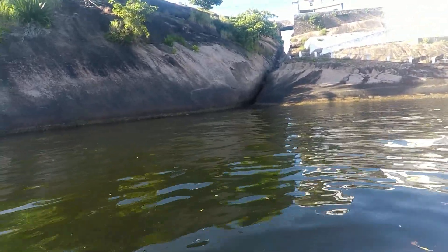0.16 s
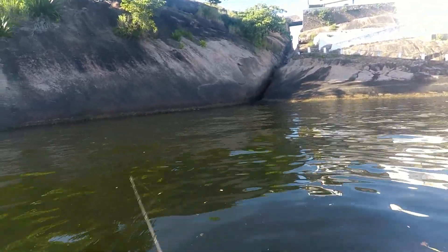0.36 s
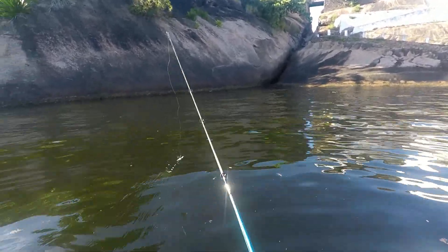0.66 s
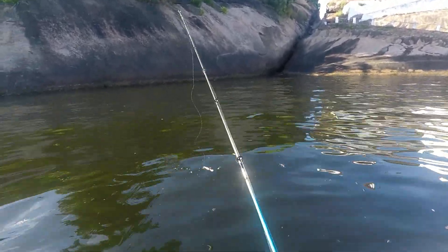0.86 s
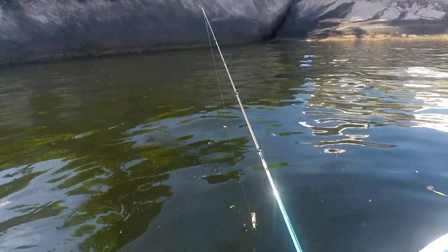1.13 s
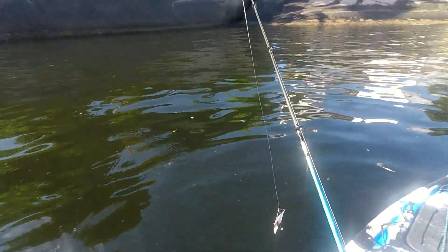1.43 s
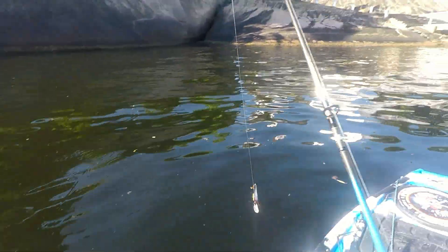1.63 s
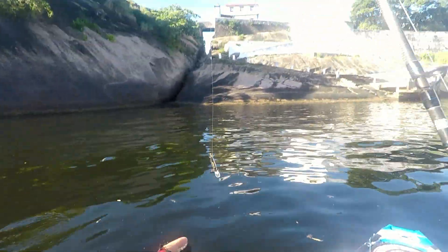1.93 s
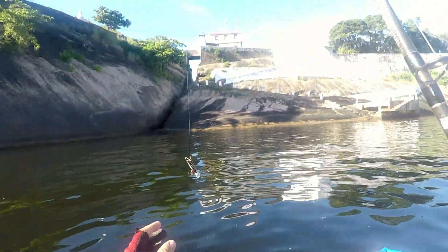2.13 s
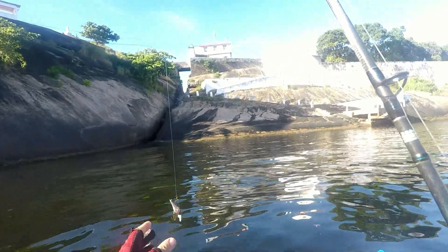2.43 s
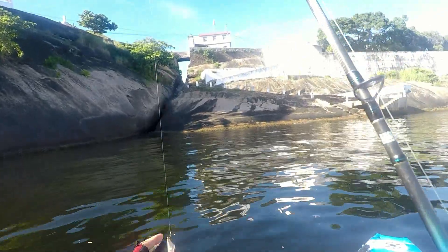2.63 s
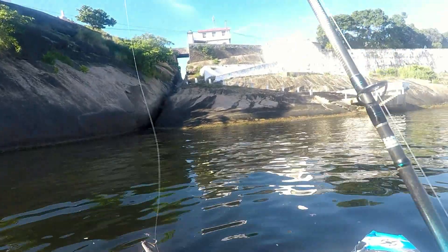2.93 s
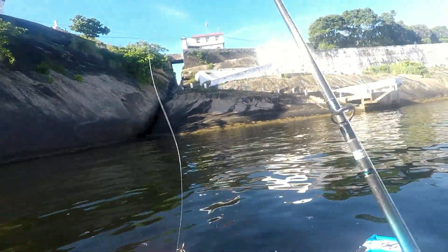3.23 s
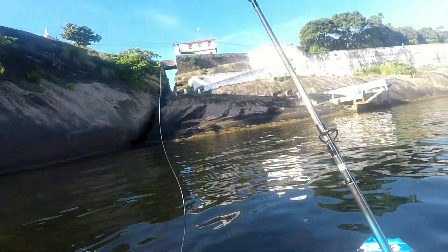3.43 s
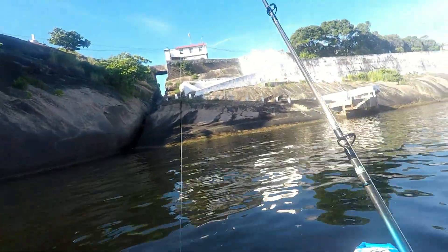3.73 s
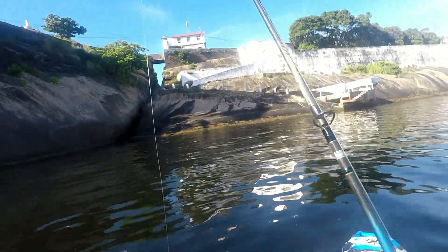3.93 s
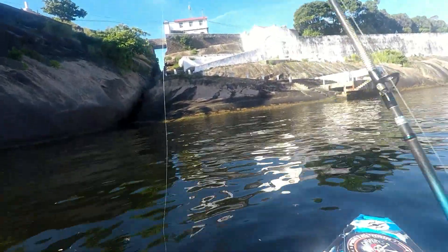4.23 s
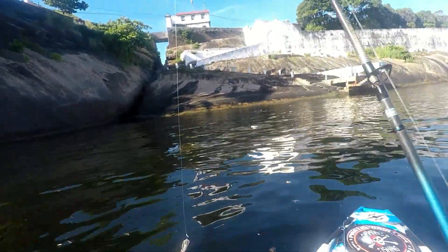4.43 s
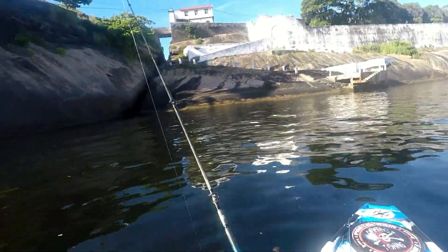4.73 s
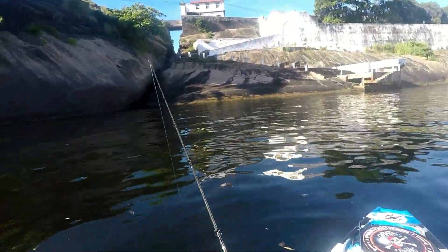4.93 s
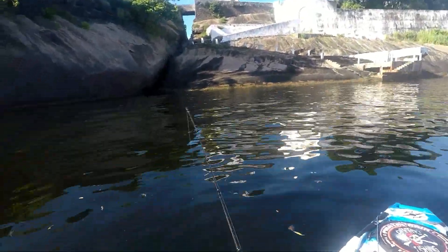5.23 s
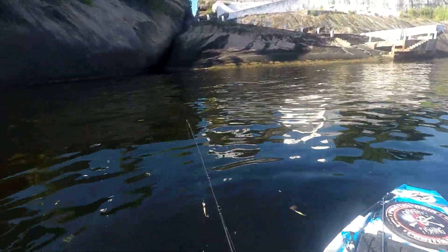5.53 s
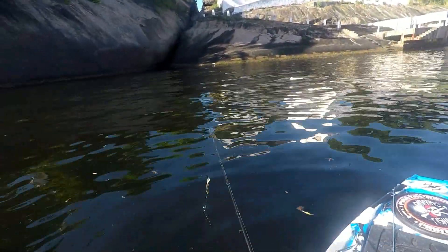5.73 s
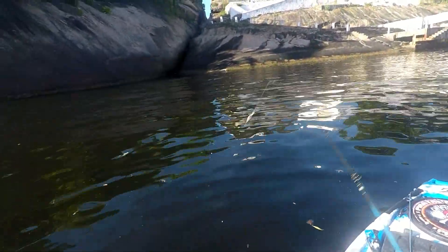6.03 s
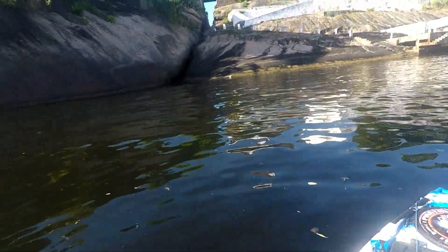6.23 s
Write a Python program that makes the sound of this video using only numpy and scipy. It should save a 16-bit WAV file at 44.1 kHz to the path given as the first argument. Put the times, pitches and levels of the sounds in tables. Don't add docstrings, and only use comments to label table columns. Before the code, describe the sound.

Outdoors on a small kayak, a distant engine throbs low and continuously beneath lapping water and thin hiss. Small ticks begin, then a cluster of dull knocks peaks sharply just after two seconds. A reel clatters and briefly whirrs, line snaps crackle, and more hard bumps follow before it settles to lighter taps. The close mounted microphone makes the handling loud and dry.

```python
import sys
import numpy as np
from scipy import signal
from scipy.fft import rfft, irfft, next_fast_len
from scipy.io import wavfile
from scipy.ndimage import uniform_filter1d, minimum_filter1d, map_coordinates

SR = 44100
rng = np.random.default_rng(int(sys.argv[2]) if len(sys.argv) > 2 else 0)


def unload_wav(signal):
    wavfile.write(
        sys.argv[1],
        SR,
        np.round(np.clip(np.atleast_2d(signal).T, -1, 1) * 32767).astype(np.int16),
    )


def to_linear_factor(level_db):
    exponent = np.asarray(level_db, float) / 20
    return 10 ** exponent


N = 280917

SHAFT_HZ = 6.003
# (order of cycle rate, level [dB rms])
DIESEL_ORDERS = [(7, -23), (8, -32.5), (9, -22.5), (12, -42), (13, -22.5), (14, -46.5), (15, -19.5),
                 (16, -33), (17, -27), (18, -41.5), (19, -36), (20, -25.5), (23, -48), (25, -34.5),
                 (36, -43.5)]
# (frequency [Hz], level [dB rms])
GENERATOR_LINES = [(50.0, -39), (100.7, -35), (184.0, -37), (200.5, -45.5), (250.5, -46.5), (263.0, -50.5)]
# (frequency [Hz], density [dB/Hz])
RUMBLE_SPECTRUM = [(12, -39.5), (28, 0), (45, 1.5), (62, 3.5), (75, -3), (112, -1.5), (128, -7),
                   (185, -12.5), (195, -15), (270, -23), (350, -37), (460, -60.5), (600, -120)]
# (frequency [Hz], density [dB/Hz])
SWELL_SPECTRUM = [(10, -42.5), (20, -4), (28, 11.5), (34, 3), (45, -64.5)]
SWELL_DB, SWELL_SWINGS_DB, DIESEL_SWINGS_DB = -30, 5.5, -0.6
# (frequency [Hz], density [dB/Hz])
WASH_SPECTRUM = [(100, -62), (200, -4.5), (400, -2.5), (490, -4), (620, -7), (900, -7.5), (1300, -13),
                 (2000, -18.5), (3300, -25), (4700, -28.5), (9000, -46), (13000, -75)]
# (frequency [Hz], density [dB/Hz])
HISS_SPECTRUM = [(1800, -71), (3300, -10), (4800, -9.5), (5800, -2.5), (7100, -4), (7750, -2), (8400, -6),
                 (9800, -9.5), (11500, -33), (14000, -67)]
# (frequency [Hz], density [dB/Hz])
AIR_SPECTRUM = [(8500, -37.5), (10200, 2), (12300, -13), (13800, -16), (15300, -43.5)]
# (time [s], hiss level [dB])
STIR_DB = [(0.0, -50), (0.9, -50), (1.09, -48.5), (1.27, -52.5), (1.64, -55.5), (2.0, -51.5), (2.4, -54),
           (2.75, -51), (3.1, -50.5), (3.28, -45), (3.46, -49.5), (4.19, -51.5), (4.37, -49.5),
           (4.7, -55.5), (5.1, -52), (5.64, -45.5), (5.82, -50.5), (6.05, -47.5)]
WASH_DB, WASH_DB_PER_STIR_DB = -41.5, 0.29

# (frequency [Hz], left minus right [dB], likeness of diffuse sound [0-1])
PORT_MATCH = [(100, 6.5, 0.6), (353, 7.5, 0.64), (600, -4.5, 0.8), (1270, 2, 0.61), (1740, 0, 0.6),
              (2310, 0, 0), (3440, -1.5, 0.8), (4630, -4.5, 0.2), (5600, -9.5, 0), (7680, -15.5, 0),
              (9300, -5, 0), (12300, -10, 0)]
# (frequency [Hz], lead [rad])
AIR_LEAD_RAD = [(100, -2.6), (500, -3.7), (1200, -3.8), (1700, -5.0), (2400, -4.4), (3300, -5.8),
                (4400, -6.0), (5500, -8.0), (9000, -6.0)]
# (frequency [Hz], lead [rad])
MOUNT_LEAD_RAD = [(100, -2.6), (520, -2.4), (720, -3.6), (1200, -3.6), (1400, -2.3), (1750, 1.3),
                  (2100, 2.8), (2600, 2.2), (3400, .8), (4400, .3), (5500, -2.0), (8000, -3.5)]

# (frequency [Hz], level [dB], t60 [s])
HULL_MODES = [(278, 3.5, 0.019), (418, -0.5, 0.016), (523, -4, 0.019)]
# (multiple of mount pitch, level [dB], t60 [s])
MOUNT_MODES = [(.65, -7, 0.023), (1.0, 5.5, 0.015), (1.3, -3, 0.012), (1.55, -6.5, 0.012), (2.15, -23, .01)]
# (frequency [Hz], level [dB], t60 [s])
ROD_MODES = [(2410, 4.5, 0.011), (2945, -5, 0.011), (3340, -9, 0.0063), (4120, -13.5, 0.0086)]
# (frequency [Hz], level [dB], t60 [s])
REEL_MODES = [(4440, -5.5, 0.021), (5040, -5, 0.016), (5850, -15, .015), (6380, -18, 0.0081),
              (7670, -5.5, 0.014), (8360, 1, 0.015), (11500, -32.5, 0.0079)]

# (time [s], peak [dB], brightness above 10 kHz [dB])
TICK_EVENTS = [(0.1753, -22.5, -32), (3.216, -35, -28), (0.93, -31, -23), (1.0055, -32, -32),
               (1.0546, -22, -32), (1.0969, -31, -23), (1.1025, -23, -18), (2.7067, -30, -22),
               (2.7543, -30, -23), (2.7656, -31.5, -19), (2.9186, -25, -32), (3.2199, -21, -9),
               (3.2333, -26, -25), (3.2551, -29, -20), (3.2683, -25, -29.5), (3.275, -24, -23),
               (3.295, -21, -13), (3.3092, -22, -25), (3.3592, -19, -16), (4.0672, -32, -19),
               (4.2888, -31, -25), (4.3791, -20.5, -16), (4.388, -25, -10), (5.1318, -17, -29),
               (5.2196, -21, -30), (5.2322, -21.5, -26), (5.2648, -27.5, -17), (5.9572, -19, -20),
               (5.9968, -31, -21), (6.152, -35, -8)]
# (start [s], length [s], typical peak [dB])
CRACKLE_RUNS = [(1.1, .07, -35.5), (2.043, .03, -37), (2.936, .04, -35.5), (3.077, .08, -34.5),
                (3.214, .12, -28), (3.35, .07, -39), (3.54, .05, -39), (4.237, .03, -32), (4.365, .07, -36),
                (5.116, .07, -32.5), (5.208, .02, -34), (5.939, .1, -35), (6.12, .015, -31),
                (6.242, .015, -28.5)]
CRACKLE_PER_S, CRACKLE_SCATTER_DB, CRACKLE_BRIGHT_DB = 75, -1.5, -20

# (time [s], mount [dB], hull [dB], mount pitch [Hz])
ROCKING_KNOCKS = [(0.4473, -22.5, -29, 726), (1.326, -37, -25, 704), (1.7837, -26.5, -40, 780),
                  (2.044, -14.5, -27.5, 780), (2.0684, -17.5, -31, 830), (2.1474, -6.5, 2.5, 965),
                  (2.1804, -20.5, -18, 626), (3.413, -9, -11.5, 650), (4.644, -30, -37, 620),
                  (4.99, -21, -23, 646), (5.506, -36, -30, 600), (5.5463, -27.5, -36.5, 1005),
                  (6.1245, -20.5, -25.5, 762)]
REBOUND_S, REBOUND_MOUNT_DB, REBOUND_HULL_DB, REBOUND_PITCH_RATIO = 0.011, -6.5, -6, 0.83
ROD_RATTLE_DB = -35.5
# (time [s], mount [dB], hull [dB], mount pitch [Hz])
DAMPED_KNOCKS = [(1.0181, -29.5, -34, 800), (1.3404, -39, -19, 730), (1.7052, -33.5, -39, 800),
                 (1.8097, -28, -53, 745), (1.921, -28, -43, 710), (2.0291, -30, -38, 830),
                 (2.12, -25, -48.5, 800), (2.1342, -13.5, -3.5, 664), (2.6681, -8.5, -9, 830),
                 (3.3034, -33, -52, 794), (3.365, -16.5, -4, 580), (3.433, -30.5, -10.5, 600),
                 (4.0037, -4.5, -32, 808), (5.2118, -21, -41, 723), (5.2517, -28, -43, 747),
                 (5.6242, -24, -49, 668), (5.9562, -34, -40, 880)]
# (time [s], rod ring [dB], reel metal [dB])
CLATTER_EVENTS = [(2.044, -27, -32.5), (2.0673, -31, -33), (2.5018, -26.5, -56.5), (2.5083, -22.5, -11.5),
                  (2.5325, -27.5, -29), (2.5538, -26, -21), (2.5789, -25.5, -26), (2.6065, -31.5, -32),
                  (2.626, -30, -38), (2.637, -42, -37), (2.644, -54, -36), (2.6669, -14.5, -44),
                  (3.408, -33.5, -60), (3.413, -31, -21.5), (3.709, -38.5, -47), (3.719, -39.5, -57.5),
                  (3.7246, -31, -43), (3.8952, -14.5, -12.5), (3.9002, -38, -34), (3.9276, -45, -48),
                  (3.941, -38, -36), (4.0034, -8.5, -27.5), (5.9562, -31, -35), (6.257, -35, -74)]
SEAT_DB, SEAT_DB_PER_REEL_DB, SEAT_HZ, SEAT_HULL_DB = -29, 0.24, 830, -17.5
HULL_LEANS_DB = 2

# (start [s], length [s], level [dB], sag over spin [dB])
WHIRR_SPINS = [
    (2.504, 0.11, -32, -11),
    (3.715, .025, -44, 1),
    (3.896, .065, -44, -2),
]
SPIN_EDGE_S = 0.008
# (start [s], length [s], frequency [Hz], level [dB])
HOOT_NOTES = [
    (4.09, .16, 595, -46),
    (4.79, .11, 745, -46),
]


def along(points, hz, column=1):
    table = np.transpose(points)
    return np.interp(np.log(hz + 1), np.log(table[0] + 1), table[column])


def unit(x):
    return x / np.sqrt(np.mean(x ** 2) + 1e-20)


def curves(rows):
    s, *cols = np.transpose(rows)
    return [np.interp(np.arange(N) / SR, s, c) for c in cols]


def wobble(rate_hz):
    coarse = np.arange(0, N + 16, 16)
    knots = rng.standard_normal(int(N * rate_hz / SR) + 4)
    return np.interp(np.arange(N), coarse, map_coordinates(knots, [coarse * rate_hz / SR]))


def filtered(x, response):
    m = next_fast_len(N + SR // 4)
    return irfft(rfft(x, m) * response(np.fft.rfftfreq(m, 1 / SR)), m)[..., :N]


def coloured(x, points):
    return filtered(x, lambda hz: to_linear_factor(along(points, hz)))


def noise(spectrum, channels=1):
    return unit(coloured(rng.standard_normal((channels, N)), spectrum))


def causal(points):
    def response(hz):
        cepstrum = irfft(along(points, hz) / 20 * np.log(10))
        cepstrum[1:len(hz) - 1] *= 2
        cepstrum[len(hz):] = 0
        return np.exp(rfft(cepstrum))
    return response


def ports(x, lead_rad):
    def response(hz):
        half = along(PORT_MATCH, hz) / 40 * np.log(10) + .5j * along(lead_rad, hz)
        return np.exp([half, -half])
    return filtered(x, response)


def diffuse(pair):
    def turn(hz):
        angle = np.arccos(np.clip(along(PORT_MATCH, hz, column=2), 0, 1)) / 2
        return np.array([np.cos(angle), np.sin(angle)])
    mid, side = filtered(pair, turn)
    return ports(np.array([mid + side, mid - side]), AIR_LEAD_RAD)


def place(times_s, shapes):
    start = np.round(np.asarray(times_s) * SR).astype(int)[:, None]
    at = start + np.arange(shapes.shape[1])
    return np.bincount(at.ravel(), shapes.ravel(), N + SR)[:N]


def even(shape, z):
    burst = shape * z
    wanted = np.linalg.norm(shape, axis=-1, keepdims=True)
    return burst * wanted / np.linalg.norm(burst, axis=-1, keepdims=True)


def ship():
    t = np.arange(N) / SR

    def line(hz, db):
        level = to_linear_factor(db + 2.5 + 1.76 * wobble(1.513))
        return level * np.sin(2 * np.pi * (hz * t + rng.random() + 0.013 * wobble(2.19)))

    load = to_linear_factor(DIESEL_SWINGS_DB * wobble(2.436))
    diesel = load * sum(line(k * SHAFT_HZ, db) for k, db in DIESEL_ORDERS)
    hum = sum(line(hz, db) for hz, db in GENERATOR_LINES)
    rumble = to_linear_factor(-19.5) * noise(RUMBLE_SPECTRUM)[0]
    swell = to_linear_factor(SWELL_DB + SWELL_SWINGS_DB * wobble(2.5)) * noise(SWELL_SPECTRUM)[0]
    lean_db = [(30, .7), (110, 1.63), (200, 2.6), (330, 12.3)]
    return filtered(diesel + hum + rumble + swell,
                    lambda hz: to_linear_factor(np.array([[.5], [-.5]]) * along(lean_db, hz)))


def rustle():
    hiss_db, = curves(STIR_DB)
    lap_db = WASH_DB + WASH_DB_PER_STIR_DB * (hiss_db + 50.5)
    lap_db = lap_db + 0.5 * wobble(3.22) + 0.75 * wobble(9.0) + 0.79 * wobble(40)
    wash = to_linear_factor(lap_db) * noise(WASH_SPECTRUM, channels=2)
    grains = to_linear_factor(1.74 * wobble(25) + 1.9 * wobble(300))
    hiss = to_linear_factor(hiss_db - 4) * unit(grains * noise(HISS_SPECTRUM, channels=2))
    air_db = .35 * (hiss_db + 54) - 71.5 + 1.5 * wobble(14) + 2.4 * wobble(40)
    air = to_linear_factor(air_db) * noise(AIR_SPECTRUM, channels=2)
    return diffuse(wash + hiss + air)


def whine():
    picture_hz = 59.94
    k = np.arange(int(picture_hz * N / SR))
    z = rng.standard_normal((len(k), 3))
    t = np.arange(SR // 100) / SR
    size = to_linear_factor(-52 + 0.98 * (-1.0) ** k[:, None] + 1.9 * z[:, :1])
    tone = np.sin(2 * np.pi * (8960 + 45 * z[:, 1:2]) * t + 3 * z[:, 2:])
    chirp = size * np.sin(np.pi * t / t[-1]) ** 2 * tone
    return to_linear_factor([[0], [-7]]) * place((k + .52) / picture_hz, chirp)


def crackle(count=9):
    start, length, db = np.transpose(CRACKLE_RUNS)[:, :, None]
    u = rng.random((len(CRACKLE_RUNS), count))
    z = rng.standard_normal((2, len(CRACKLE_RUNS), count))
    s = start + (np.arange(count) + u) / CRACKLE_PER_S
    rows = np.array([s, db + CRACKLE_SCATTER_DB * z[0], CRACKLE_BRIGHT_DB + 5 * z[1]])
    return rows[:, s < start + length].T


def ticks():
    s, db, bright_db = np.vstack([TICK_EVENTS, crackle()]).T
    t = np.arange(SR // 100) / SR
    t60_s = 0.0058 * to_linear_factor(3.5 * rng.standard_normal((len(s), 1)))
    snaps = even(to_linear_factor(db[:, None] - 60 * t / t60_s), rng.standard_normal((2, len(s), len(t))))

    def cavity(hz):
        resonance = 1j * hz * 1200 / (7600 ** 2 - hz * hz + 1j * hz * 1200)
        return to_linear_factor(along(HISS_SPECTRUM, hz) + 7.5) * (.55 + .6 * resonance)

    body = filtered(place(s, snaps[0]), cavity)
    edge = coloured(place(s, to_linear_factor(bright_db)[:, None] * snaps[1]),
                    [(6000, -64), (9500, -1.5), (12300, 6.5), (14000, -9.0), (16000, -64)])
    return body + edge


def contacts():
    silent_db = -80
    rows = []
    for s, mount, hull, hz in ROCKING_KNOCKS + DAMPED_KNOCKS:
        rows.append((s, hull, mount, mount + ROD_RATTLE_DB, silent_db, hz))
    for s, mount, hull, hz in ROCKING_KNOCKS:
        rows.append((s + REBOUND_S, hull + REBOUND_HULL_DB, mount + REBOUND_MOUNT_DB,
                     silent_db, silent_db, hz * REBOUND_PITCH_RATIO))
    for s, rod, reel in CLATTER_EVENTS:
        seat = SEAT_DB + SEAT_DB_PER_REEL_DB * (reel + 30)
        rows.append((s, seat + SEAT_HULL_DB, seat, rod, reel, SEAT_HZ))
    return rows


def ring(modes, level_db, t, scatter, scale=1):
    out = np.zeros((len(level_db), len(t)))
    for k, (hz, db, t60) in enumerate(modes):
        z = rng.standard_normal((len(level_db), 3))
        pitch_hz = hz * scale * (1 + scatter * z[:, :1])
        decay = to_linear_factor(db + 1.8 * z[:, 1:2] - 60 * t / t60)
        out += (-1) ** k * decay * np.sin(2 * np.pi * pitch_hz * t + 0.5 * z[:, 2:])
    return out * to_linear_factor(level_db)[:, None]


def blows():
    s, hull_db, mount_db, rod_db, reel_db, mount_hz = np.transpose(contacts())
    t = np.arange(SR // 24) / SR

    def rise(seconds):
        return 1 - np.exp(-(t / seconds) ** 2)

    hull = rise(0.0011) * ring(HULL_MODES, hull_db - 1.0, t, scatter=0.037)
    mount = rise(0.00051) * ring(MOUNT_MODES, mount_db + 1.5, t, scatter=0.037, scale=mount_hz[:, None])
    rod = rise(0.0011) * ring(ROD_MODES, rod_db + 4.0, t, scatter=0.017)
    reel = rise(0.0011) * ring(REEL_MODES, reel_db - 4.5, t, scatter=.012)

    force_db = (mount_db + 0.65 * (mount_db + 11))[:, None]
    burst = even(to_linear_factor(force_db - 4 - 60 * t / 0.01), rng.standard_normal((len(s), len(t))))
    click = to_linear_factor(force_db + 16.5) * (np.arange(len(t)) == SR // 2000)
    crack = filtered(place(s, burst + click), causal(
        [(150, -35), (450, 7.5), (1150, 7), (1650, -6), (2800, -12), (5000, -47), (9000, -59.5)]))

    grit_db = np.maximum(rod_db - 10, reel_db)[:, None] - 60 * t / 0.0098
    grit = coloured(place(s, to_linear_factor(grit_db) * rng.standard_normal((len(s), len(t)))),
                    [(1200, -53.0), (2800, -1.5), (8500, -3.5), (12500, -27.5), (15500, -39)])
    lean = to_linear_factor([[HULL_LEANS_DB], [-HULL_LEANS_DB]])
    return lean * place(s, hull) + place(s, mount + rod + reel) + crack + grit


def deck(x):
    t = np.arange(SR // 12) / SR
    tail = rng.standard_normal((2, len(t))) * to_linear_factor(-60 * t / 0.0099) * (t > .003)
    return signal.fftconvolve(x, tail / np.linalg.norm(tail[0]), axes=1)[:, :N]


def whirr():
    shake = noise([(550, -29.5), (720, -5.5), (770, 6.5), (830, -2.5), (1000, -14), (1180, -4.5),
                   (1400, -33.0), (2400, -27.0), (3000, -48.0)])[0]
    t = np.arange(N) / SR
    spin = np.zeros(N)
    for s, length, db, sag_db in WHIRR_SPINS:
        level = to_linear_factor(db + sag_db * np.clip((t - s) / length, 0, 1))
        inside_s = np.minimum(t - s, s + length - t)
        spin += level * np.clip(inside_s / SPIN_EDGE_S + 1, 0, 1) ** 2
    return spin * to_linear_factor(2.6 * wobble(70)) * shake


def hoots():
    t = np.arange(N) / SR
    out = np.zeros(N)
    for s, length, hz, db in HOOT_NOTES:
        swell = np.sin(np.pi * np.clip((t - s) / length, 0, 1)) ** 0.5
        out += to_linear_factor(db) * swell * np.sin(2 * np.pi * hz * t)
    return out


def scene():
    near = ports(ticks(), AIR_LEAD_RAD) + ports(blows() + whirr(), MOUNT_LEAD_RAD)
    far = ship() + rustle() + whine() + to_linear_factor([[-5], [0]]) * hoots()
    return far + near + to_linear_factor(-12.0) * deck(near)


def roll_off(x):
    return signal.sosfilt(signal.butter(12, 15600, fs=SR, output="sos"), x)


def record(dry):
    sharp = np.abs(filtered(dry, lambda hz: hz > 250)).max(0)
    gain = np.minimum(1, 0.55 / (sharp + 1e-9)) ** 0.59
    held = minimum_filter1d(gain, size=1801, origin=850)
    x = dry * uniform_filter1d(held, size=601)
    x = x / (1 + np.abs(x) ** 8) ** (1 / 8)
    return roll_off(x)


dry = scene()
out = record(dry)
unload_wav(out)
```